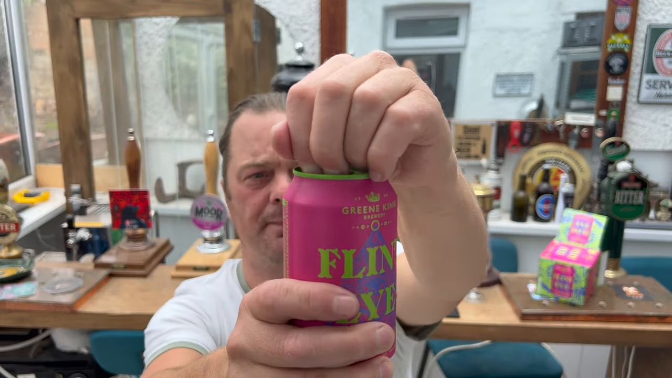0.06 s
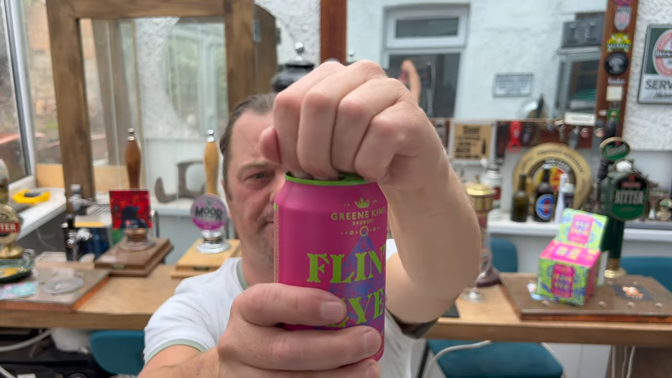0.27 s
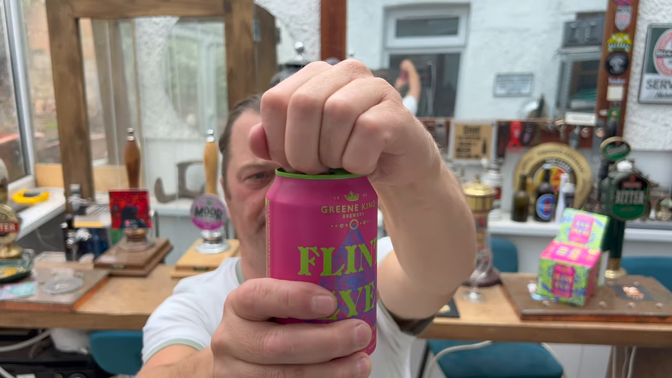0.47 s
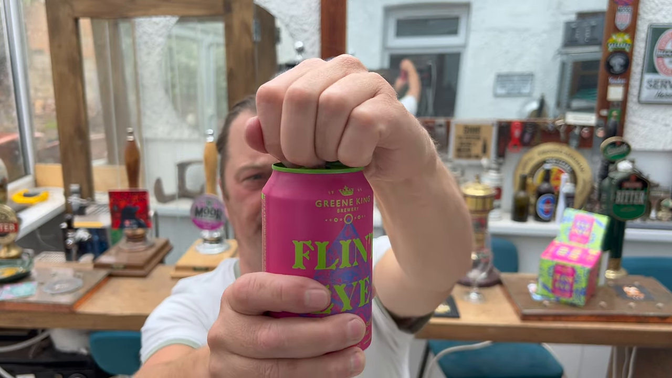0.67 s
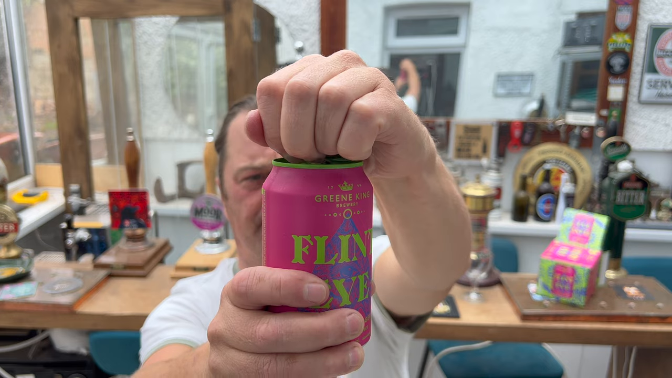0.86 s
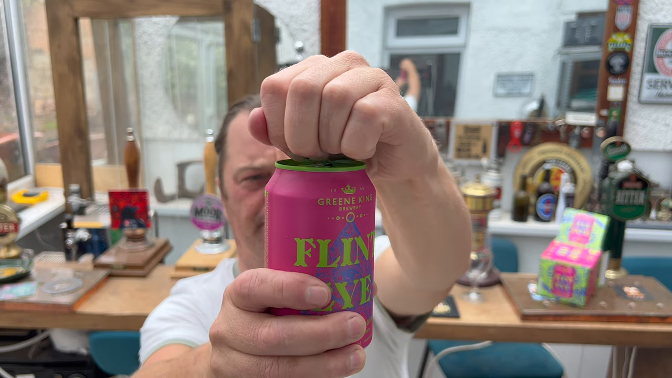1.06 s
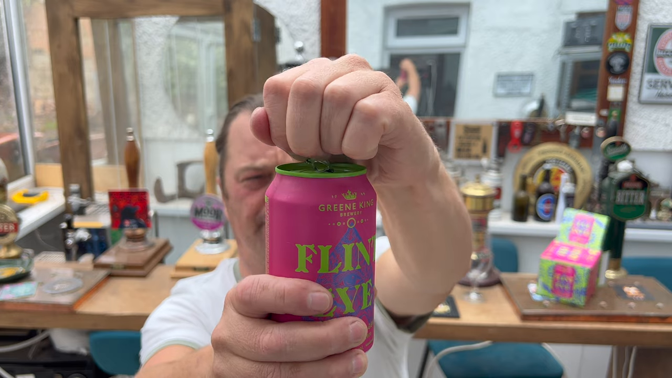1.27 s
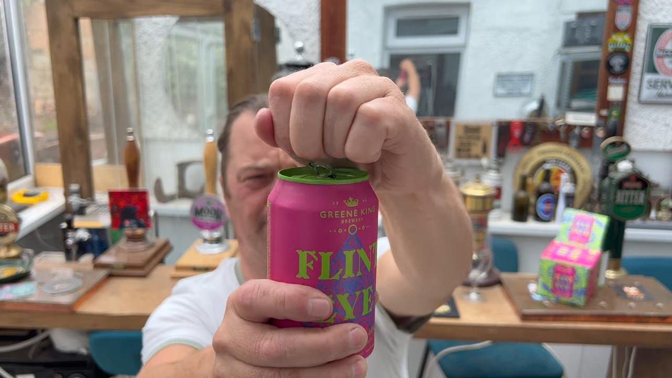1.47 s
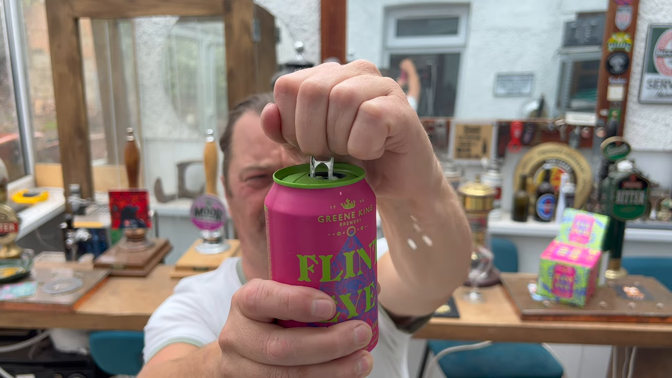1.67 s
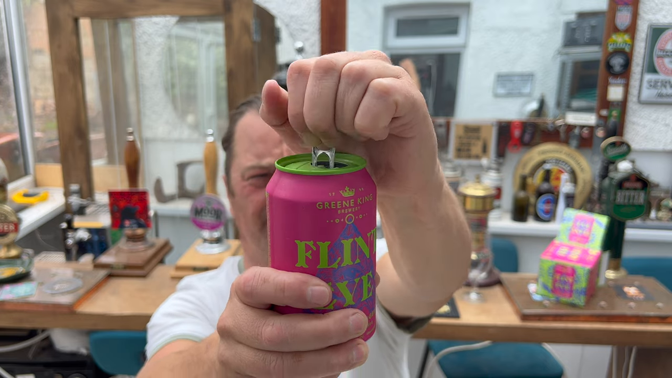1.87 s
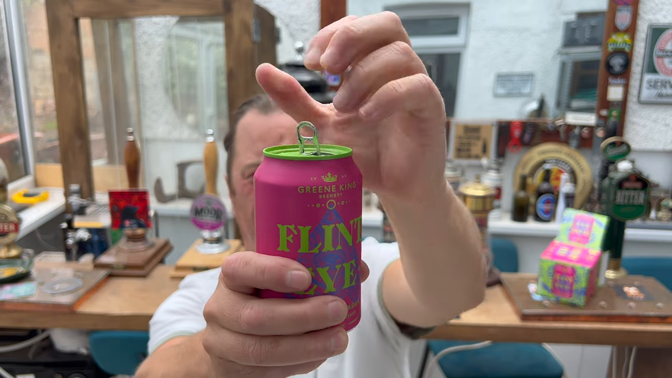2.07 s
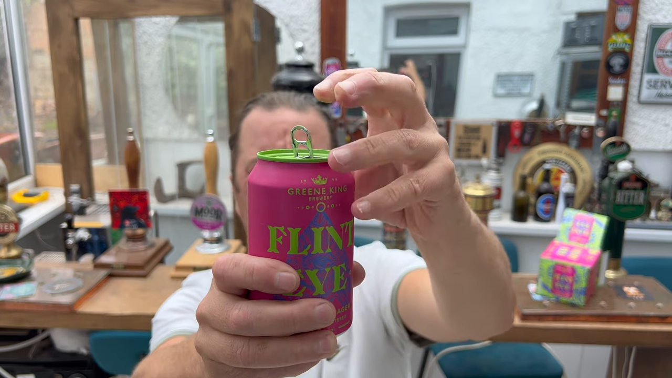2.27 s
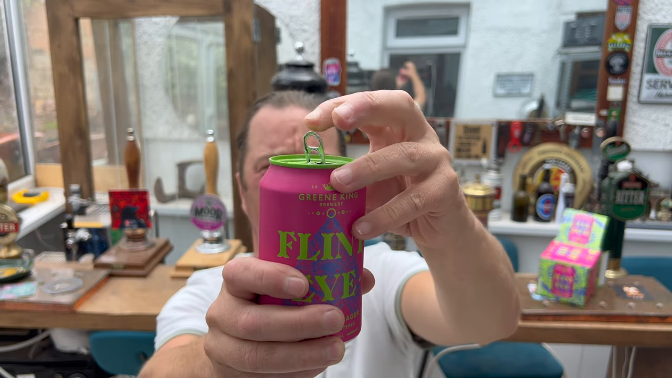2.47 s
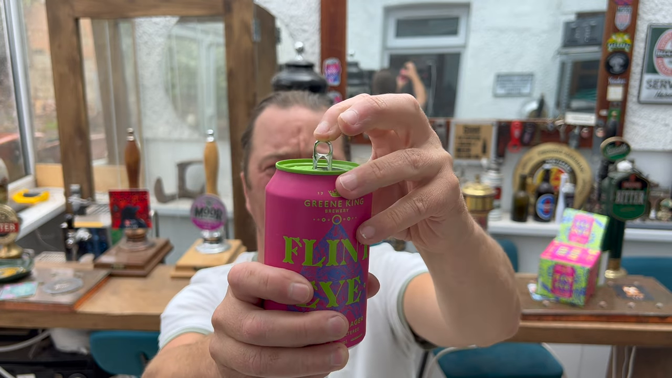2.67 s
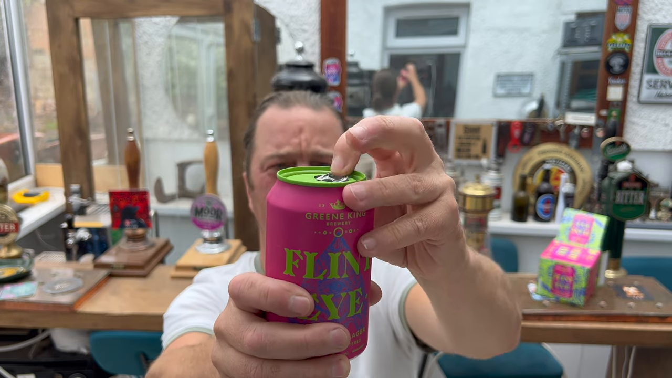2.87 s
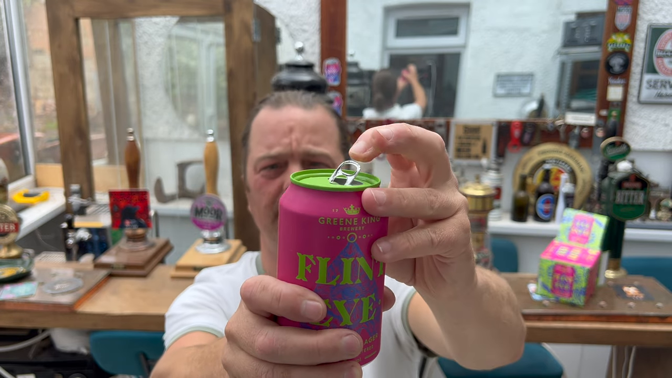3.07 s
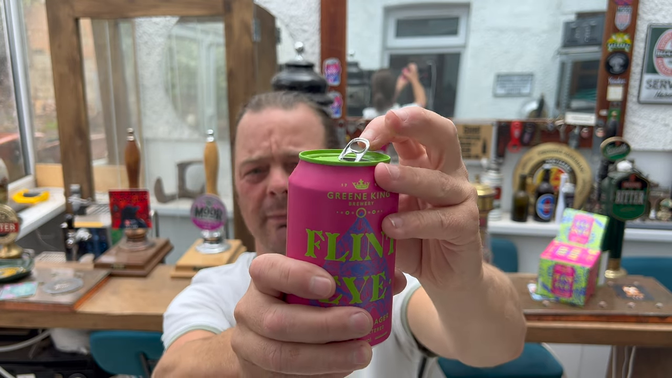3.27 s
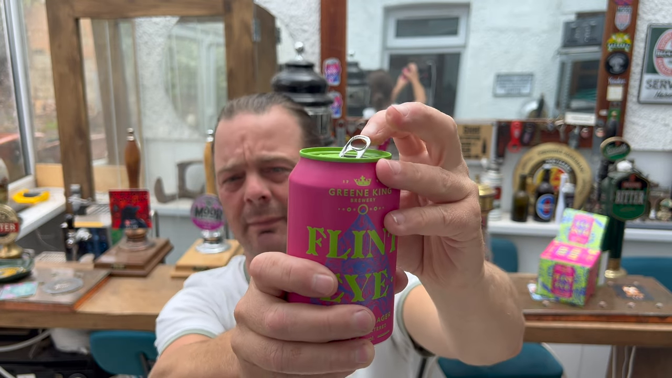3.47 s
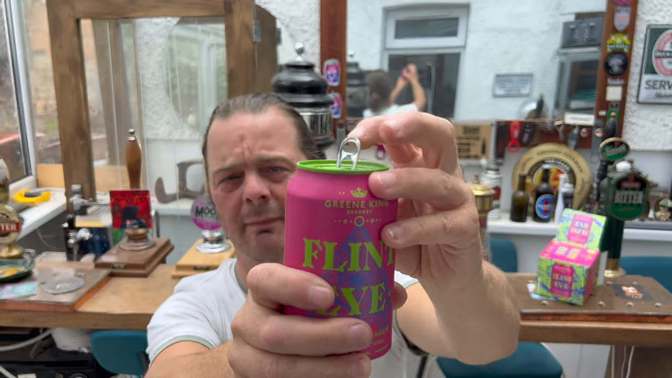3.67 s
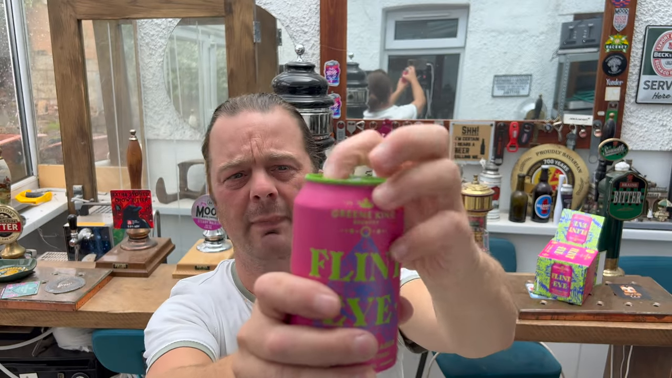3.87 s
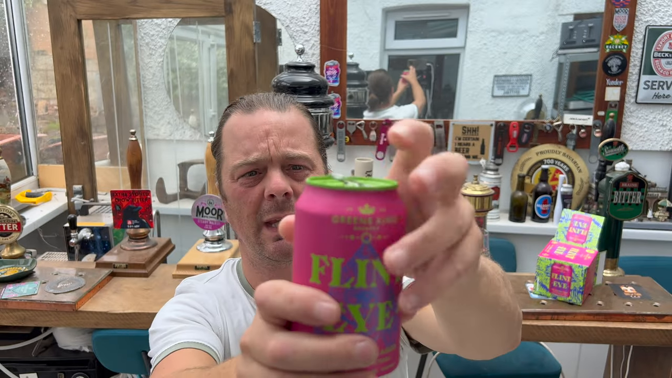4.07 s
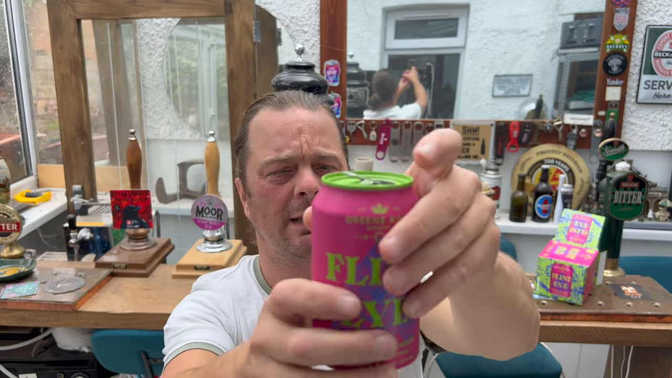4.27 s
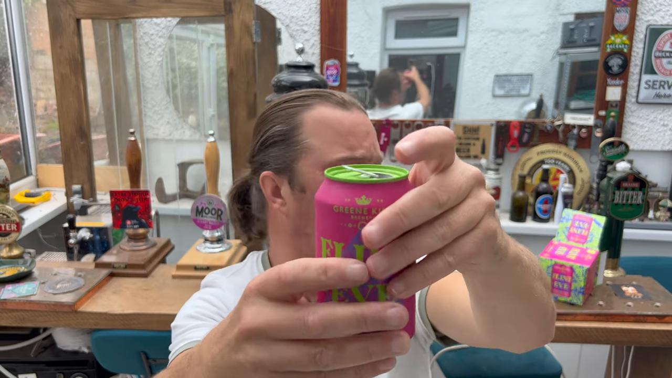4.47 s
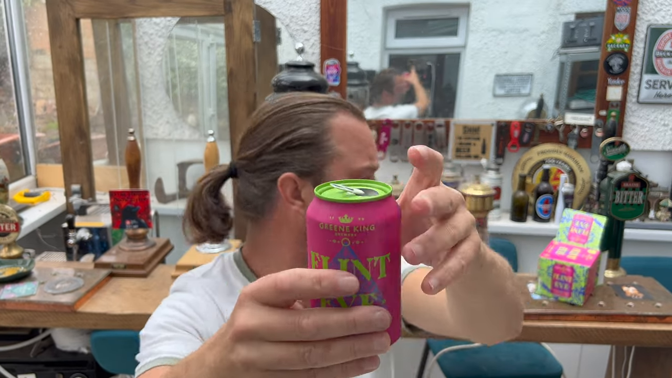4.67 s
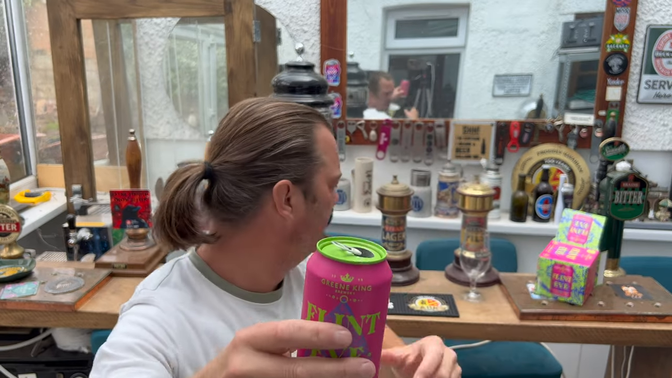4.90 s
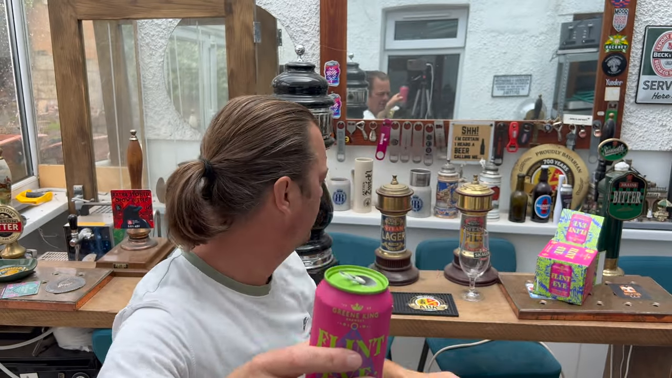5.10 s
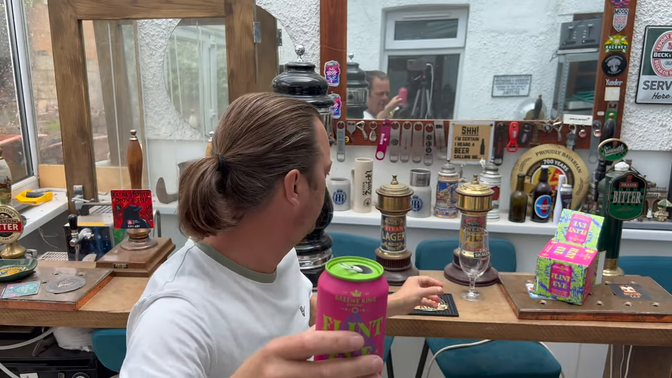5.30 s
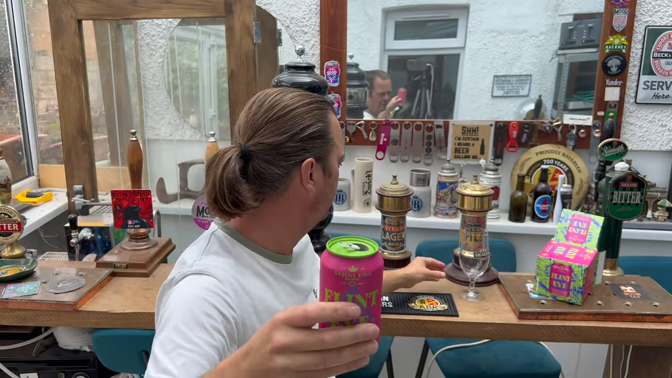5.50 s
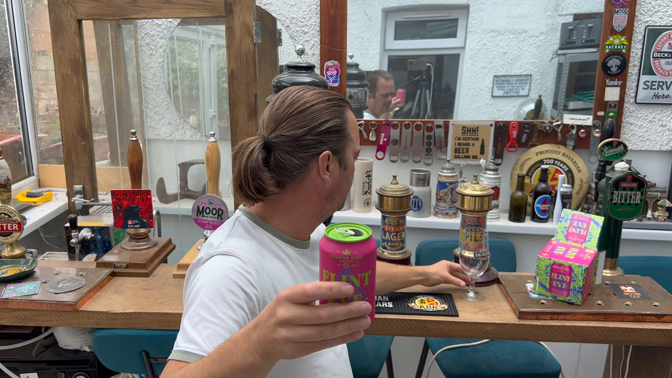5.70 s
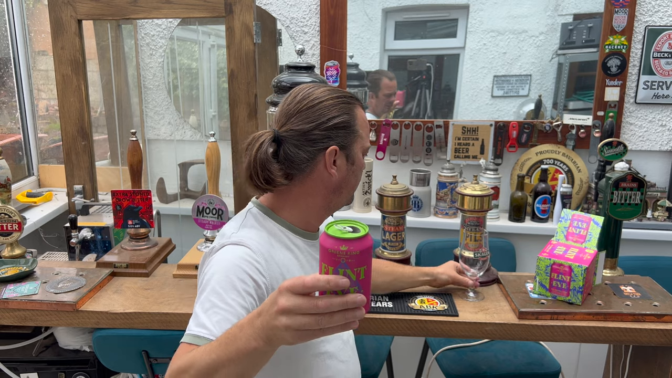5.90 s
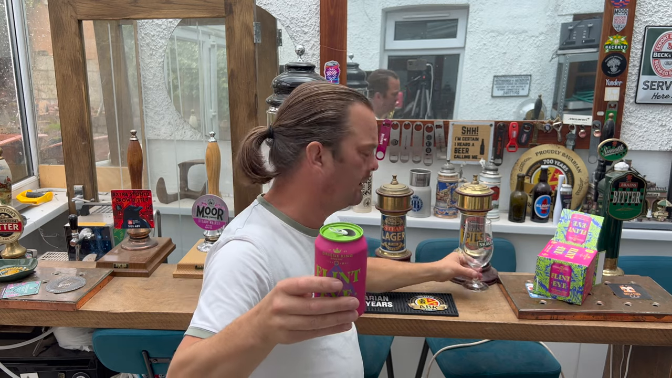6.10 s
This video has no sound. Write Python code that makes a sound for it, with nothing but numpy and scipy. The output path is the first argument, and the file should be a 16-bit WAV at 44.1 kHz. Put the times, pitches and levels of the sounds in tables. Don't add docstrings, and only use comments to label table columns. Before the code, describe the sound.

Fingertip ticks on a metal drink can, a sharp crack and gas spurt, then a deep pop, soft fizz and scattered tapping.

```python
import sys
import numpy as np
from scipy import signal
from scipy.fft import rfft, irfft, next_fast_len
from scipy.io import wavfile
from scipy.ndimage import uniform_filter1d, map_coordinates

SR = 44100
rng = np.random.default_rng(int(sys.argv[2]) if len(sys.argv) > 2 else 0)


def wav_record(signal):
    frames = np.transpose(np.atleast_2d(signal))
    bounded = np.clip(frames, -1, 1)
    quanta = np.round(bounded * 32767).astype(np.int16)
    wavfile.write(sys.argv[1], SR, quanta)


def volts(x):
    e = np.asarray(x, float) / 20
    return 10 ** e


N = 271038
T = np.arange(N) / SR

# (time [s], hum level [dB])
HUM_LEVEL = [(0, -56), (.15, -57), (.9, -58), (1.35, -58.5), (1.9, -56), (2.36, -58.5), (2.98, -62.5),
             (3.2, -63.5), (3.5, -60.5), (4.13, -57.5), (4.42, -55.5), (5.14, -58), (5.37, -55.5),
             (5.8, -57.5), (6.15, -58.5)]
# (frequency [Hz], density [dB per Hz])
AIR_SPECTRUM = [(76, -40), (130, -6.5), (182, -4.5), (272, -7.5), (337, -11.5), (363, -6), (563, -11.5),
                (631, -19.5), (733, -12), (1170, -20), (1480, -14.5), (1810, -20), (2600, -46), (3380, -70),
                (5720, -120)]
# (frequency [Hz], density [dB per Hz])
RUMBLE_SPECTRUM = [(12, -50.5), (20, -24.5), (54, -4.5), (75, -4.5), (90, -4), (120, -27.5), (200, -120)]
# (time [s], hum dip [dB], half length [s])
BASS_DUCKS = [
    (1.119, -6, 0.24),
    (1.659, -24, 0.16),
]
# (time [s], rumble level [dB], hold [s])
FLOOR_SHOVES = [
    (.9, -63, .01),
    (1.1, -59, 0.016),
    (1.54, -61, 0.28),
]
# (time [s], peak level [dB], hold [s])
RUBS = [(.198, -73, 0.018), (.476, -73.5, .01), (.66, -74.5, .01), (.85, -73, 0.042), (1.95, -68, .005),
        (2.05, -75.5, 0.093), (2.26, -76, 0.0095), (2.37, -78, .05), (2.6, -74, 0.054), (2.70, -67, .01),
        (2.84, -74.5, 0.04), (3.035, -66.5, .005), (3.2, -65.5, .005), (3.325, -69, 0.011),
        (3.44, -68, 0.0055), (3.63, -69, 0.03), (3.79, -64, .005), (3.91, -61, 0.012), (4.1, -73, 0.065),
        (4.19, -66.5, .08), (4.33, -62.5, 0.089), (4.45, -68, 0.077), (4.57, -67, 0.36),
        (4.88, -71.5, 0.35), (5.345, -59, 0.019), (5.63, -73.5, 0.099), (5.9, -75, 0.046),
        (6.11, -74.5, 0.058)]
# (frequency [Hz], density [dB per Hz])
CLOTH_SPECTRUM = [(1180, -19), (2000, -2), (2740, -9.5), (3700, -12), (6730, -10.5), (9000, -19),
                  (10200, -24), (11400, -25), (13000, -31.5)]
# (frequency [Hz], left-right likeness [-1 to 1])
DIFFUSE_LIKENESS = [(60, 0.87), (130, 0.79), (290, 0.4), (640, -0.23), (1410, 0.35), (3100, -0.1),
                    (6820, -0.043), (15000, 0.89)]
# (frequency [Hz], left minus right [dB])
DIFFUSE_BALANCE = [(60, -1.5), (110, -3), (200, 4.5), (380, 5), (700, 3), (1290, 4.5), (2380, 4),
                   (4400, 11.5), (8120, 10.5), (15000, -10)]
# (frequency [Hz], left minus right [dB])
CAN_BALANCE = [(60, 3.3), (500, 4), (1400, 1), (2400, 3), (5000, 7), (9000, 1), (15000, -.5)]
# (frequency [Hz], left lead [rad])
CAN_LEAD = [(0, 0), (1000, .45), (2000, 1.0), (4500, 2.0), (6000, 2.5), (6800, .4), (7300, -1.2),
            (9200, -2.2), (10500, -3.4), (11900, -6.3), (13600, -9.4), (15500, -12.6), (16500, -13.6)]
# (frequency [Hz], t60 [s])
ROOM_T60 = [(300, 0.53), (800, 0.24), (2000, 0.48), (5500, 0.53), (9000, 0.37), (11000, 0.26),
            (15000, 0.25)]
# (frequency [Hz], level [dB])
ROOM_LEVEL = [(200, -28), (600, -12.5), (1000, -0.5), (2000, -10), (3000, -6.5), (4200, -3.5), (5000, -14),
              (5750, -10), (6600, -10), (8000, -5), (11000, -19.5), (15000, -21.5)]
# (frequency [Hz], density [dB per Hz])
TRAIL_SPECTRUM = [(300, -40), (550, -15), (900, -2), (1600, -6), (3900, -1.5), (7140, -1.5), (9300, -10.5),
                  (11500, -44.5)]
# (time [s], peak level [dB], frequency [Hz])
BODY_BUMPS = [
    (4.546, -51.5, 177),
    (5.389, -48.5, 217.5),
    (5.416, -48.5, 176.3),
]
# (time [s], peak level [dB], knock [Hz], nail level [dB], skin level [dB])
FINGER_TICKS = [(0.181, -47, 790, -33, -15), (0.295, -38.5, 780, -64, -33), (1.942, -41, 1410, -14, -8),
                (1.955, -41.5, 859, -26, -9), (2.678, -46, 1400, -23, -7),
                (2.696, -46.5, 1209, -14.5, -4.5), (2.71, -42.5, 1190, -25.5, -7),
                (2.795, -44, 780, -35, -21), (2.834, -51, 1530, -31, -2), (3.031, -41, 1100, -11.5, -22),
                (3.198, -44.5, 1427, -10.5, -17.5), (3.316, -51, 1110, -25.5, -18),
                (3.442, -41.5, 1113, -15.5, -27.5), (3.633, -54, 1520, -19, -16),
                (3.79, -43, 1170, -16.5, -19), (3.909, -29.5, 1968, -45, -12.5),
                (4.185, -47.5, 1420, -12, -8), (4.317, -49, 1760, -9, -10), (4.326, -45.5, 1400, -7, -7),
                (4.347, -40.5, 1440, -7.5, -12)]
# (time [s], pitch [Hz], level [dB])
POP_FALL = [
    (1.554, 5600, -45),
    (1.5601, 4972, -24.5),
    (1.567, 1500, -22.5),
    (1.570, 220, -26.5),
    (1.575, 100, -30),
    (1.581, 76, -17.5),
    (1.590, 63, -25),
    (1.607, 47, -39),
    (1.623, 45, -65.5),
]
# (time [s], flow level [dB], opening [0-1])
GAS_SPURTS = [
    [(.886, -80, 0.55), (.897, -54.5, .5), (.899, -28, 0.57), (.904, -33, 0.79), (.910, -40.5, 0.3),
     (.95, -48, 0.2), (1.0, -68, .3)],
    [(1.008, -51.5, 0.6), (1.018, -44.5, .3), (1.021, -26, 0.1), (1.05, -26.5, 0.34), (1.066, -23.5, 0.4),
     (1.075, -26.5, 0.8), (1.088, -27.5, .6), (1.097, -29.5, 0.4), (1.101, -56, .8)],
    [(1.525, -48, .3), (1.531, -45.5, 0.98), (1.535, -29, 0.84), (1.552, -31, 0.87), (1.557, -19, 0.42),
     (1.566, -22, 0.58), (1.571, -46.5, 0.9), (1.61, -58, 0.81), (1.75, -90, .9)],
]
# (frequency [Hz], density [dB per Hz])
JET_SPECTRUM = [(120, -37), (400, -18.5), (1200, -16), (2000, -10), (3000, -21), (4200, -6.5), (5700, -3.5),
                (7200, -1.5), (9500, 3), (12000, 0), (15300, -11.5), (16200, -0.5), (16500, -62)]
# (frequency [Hz], level [dB])
LID_MODES = [(1420, -22.5), (1780, -12.5), (1860, -10.5), (1980, -2.5), (2110, -9), (2180, -7)]
SPURT_GRIP_DB = [-7.5, -2.6, -3]
# (time [s], lid ring [dB], rim pitch [Hz], rim ring [dB], snap [dB])
LID_BREAKS = [(.8978, -29, 7500, -26, -13), (.8998, -31, 5050, -21, -15), (1.0088, -38, 7000, -38, -32),
              (1.0190, -42, 7200, -32, -28), (1.0688, -7, 4100, -17, -22), (1.0914, -10, 5700, -17, -20),
              (1.0963, -10, 5700, -14, -15), (1.5262, -33, 8000, -40, -30), (1.5318, -18, 8000, -26, -13),
              (1.5356, -18, 4600, -20, -8), (1.5560, -28, 7000, -27, -15), (1.5615, -26, 5500, -19, -12),
              (1.5643, -18, 4300, -21, -16)]

HUM_HZ, HUM_WIDTH_HZ, USUAL_HUM_DB = 106.6, 42, -56.5
AIR_DB, AIR_DB_PER_HUM_DB, AIR_DUCK = -59.5, .45, 1.9
RUMBLE_DB, RUMBLE_DB_PER_HUM_DB = -64, 2.6
SHOVE_RISE_DB_PER_S, SHOVE_FALL_DB_PER_S = 12.5, 89
RUB_RISE_DB_PER_S, RUB_FALL_DB_PER_S, FAR_HISS_DB = 65, 146, -78.5
PORTS_HZ, PORTS_LIKENESS = 8500, .7
BOOM_START_S, BOOM_PEAK_S, BOOM_HZ, BEAT_HZ, NEIGHBOUR_GAIN = 1.61, 1.88, 48.9, 4.4, 0.51
BOOM_DB, BOOM_RISE_DB_PER_S, BOOM_FALL_DB_PER_S = -38.5, 8, 115.5
TRAIL_START_S, TRAIL_DB, TRAIL_FALL_DB_PER_S, TRAIL_FALL_DB_PER_S2 = 1.578, -39.5, 34.5, 75
SKIN_TOP_DB = -8
TROUGH_S = 1.5808
BREATHY_HZ, BREATHY_GAIN = 1500, 0.95
LID_SHUT_DB, LID_OPENS_DB = -14, 21.5
RIM_SHUT_DB, RIM_OPENS_DB = -18.5, 28.5
RIM_SHUT_HZ, RIM_DROP_HZ = 7380, 2585
LID_HZ, LID_SAG_HZ_PER_DB = 1863, 10
TEAR_S = .0031
THUD_DB, THUD_DB_PER_LID_DB, THUD_T60_S = -19, 1.6, 0.024


def unit(x):
    return x / np.sqrt(np.mean(x ** 2) + 1e-20)


def along(points, hz):
    f, v = np.transpose(points)
    return np.interp(np.log(hz + 1), np.log(f + 1), v)


def curves(rows, outside=None):
    s, *cols = np.transpose(rows)
    return np.array([np.interp(T, s, c, outside, outside) for c in cols])


def strokes(rows, rise_db, fall_db, rest_db):
    levels = [rest_db + 0 * T]
    for s, db, hold in rows:
        rise = rise_db / np.sqrt(abs(hold) + 1e-3) * np.maximum(s - T, 0)
        levels.append(db - rise - fall_db * np.maximum(T - s - hold, 0))
    return np.max(levels, axis=0)


def wobble(rate_hz):
    return map_coordinates(rng.standard_normal(int(N * rate_hz / SR) + 4), [T * rate_hz])


def filtered(x, response):
    m = next_fast_len(N + SR // 2)
    return irfft(rfft(x, m) * response(np.fft.rfftfreq(m, 1 / SR)), m)[..., :N]


def band(x, lo_hz, hi_hz):
    sos = signal.butter(N=2, Wn=[lo_hz, hi_hz], btype="band", fs=SR, output="sos")
    return unit(signal.sosfilt(sos, x))


def resonant(modes, width_hz):
    def peaks(f):
        return sum(volts(db) * 1j * f * width_hz / (c * c - f * f + 1j * f * width_hz) for c, db in modes)
    return unit(filtered(rng.standard_normal(N), peaks))


def small_body(x, corner_hz):
    return filtered(x, lambda f: (1j * f / (corner_hz + 1j * f)) ** 3)


def add(out, s, sound):
    out[round(s * SR):][:len(sound)] += sound


def diffuse(pair, gain):
    def split(hz):
        ports = PORTS_LIKENESS * np.cos(np.interp(hz, *np.transpose(CAN_LEAD)))
        likeness = np.where(hz > PORTS_HZ, ports, along(DIFFUSE_LIKENESS, hz))
        turn = np.arccos(np.clip(likeness, -1, 1)) / 2
        return gain(hz) * np.array([np.cos(turn), np.sin(turn)])

    mid, side = filtered(pair, split)
    left_right = np.array([mid + side, mid - side])
    return filtered(left_right, lambda hz: volts(np.outer([.5, -.5], along(DIFFUSE_BALANCE, hz))))


def rush(spectrum, patchy_db):
    z = signal.stft(rng.standard_normal((2, N)), nperseg=512)[2]
    field = uniform_filter1d(rng.standard_normal(z.shape[1:]), size=6, axis=0)
    field = uniform_filter1d(field, size=10, axis=1)
    pair = signal.istft(z * volts(patchy_db * unit(field)), nperseg=512)[1][:, :N]
    return unit(diffuse(pair, lambda hz: volts(along(spectrum, hz))))


def room_tone():
    hum_db = curves(HUM_LEVEL)[0]
    duck_db = sum(db * np.maximum(1 - np.abs(T - s) / half, 0) for s, db, half in BASS_DUCKS)
    change_db = hum_db - USUAL_HUM_DB
    air_db = AIR_DB + AIR_DB_PER_HUM_DB * change_db - AIR_DUCK * duck_db ** 2 / 10
    shove_db = strokes(FLOOR_SHOVES, SHOVE_RISE_DB_PER_S, SHOVE_FALL_DB_PER_S, -140)
    rumble_db = np.maximum(RUMBLE_DB + RUMBLE_DB_PER_HUM_DB * change_db, shove_db)
    line = np.sin(2 * np.pi * HUM_HZ * T + .5 * wobble(4))
    hum = unit(line + .25 * resonant([(HUM_HZ, 0)], width_hz=HUM_WIDTH_HZ))
    air = volts(air_db) * rush(AIR_SPECTRUM, patchy_db=.8)
    rumble = volts(rumble_db) * rush(RUMBLE_SPECTRUM, patchy_db=1)
    return air + rumble + volts(hum_db + duck_db) * hum * volts([[1.4], [-1.6]])


def rustle():
    db = strokes(RUBS, RUB_RISE_DB_PER_S, RUB_FALL_DB_PER_S, FAR_HISS_DB) + 1.2 * wobble(30)
    return volts(db) * rush(CLOTH_SPECTRUM, patchy_db=2.0)


def room(x):
    hz, t, z = signal.stft(rng.standard_normal((2, SR)), SR, nperseg=256)
    tail = signal.istft(z * volts(-60 * t / along(ROOM_T60, hz)[:, None]), SR, nperseg=256)[1]
    tail = tail * np.clip((np.arange(tail.shape[1]) / SR - .0105) / .003, 0, 1)
    wet = signal.fftconvolve(x[None], tail / np.linalg.norm(tail[0]), axes=1)[:, :N]
    return diffuse(wet, lambda hz: volts(along(ROOM_LEVEL, hz)))


def near(x):
    half = np.array([[.5], [-.5]])
    lead_hz, lead_rad = np.transpose(CAN_LEAD)

    def ports(hz):
        return volts(half * along(CAN_BALANCE, hz)) * np.exp(1j * half * np.interp(hz, lead_hz, lead_rad))
    return filtered(x, ports)


def boom():
    t = T - BOOM_PEAK_S
    db = BOOM_DB + BOOM_RISE_DB_PER_S * np.minimum(t, 0) - BOOM_FALL_DB_PER_S * np.maximum(t, 0)
    fade = np.clip((T - BOOM_START_S) / 0.028, 0, 1)
    mode = np.sin(2 * np.pi * (BOOM_HZ + BEAT_HZ / 2) * t)
    neighbour = NEIGHBOUR_GAIN * np.sin(2 * np.pi * (BOOM_HZ - BEAT_HZ / 2) * t)
    return fade * volts(db) * (mode + neighbour) * volts([[1.6], [-1.9]])


def trailing_hiss():
    t = np.maximum(T - TRAIL_START_S, 0)
    db = TRAIL_DB - TRAIL_FALL_DB_PER_S * t - TRAIL_FALL_DB_PER_S2 * t ** 2 + 1.5 * wobble(300)
    return (1 - volts(-600 * t)) * volts(db) * rush(TRAIL_SPECTRUM, patchy_db=2.0)


def fingers():
    out, t = np.zeros(N), np.arange(SR // 10) / SR
    partials = ((.72, 0.41), (.89, 0.45), (1, 1.22), (1.13, 0.4), (1.37, 0.18))
    for s, db, hz, nail_db, skin_db in FINGER_TICKS:
        noise = rng.standard_normal(len(t))
        knock = sum(g * np.sin(2 * np.pi * hz * k * t) for k, g in partials)
        knock = knock * volts(-60 * t / 0.027) * (1 - volts(-20000 * t))
        grit = volts(nail_db) * band(noise, 2550, 2740) + volts(skin_db) * band(noise, 2880, 8500)
        grit = grit + 0.33 * band(noise, 0.36 * hz, 1.75 * hz)
        puff = volts(skin_db + SKIN_TOP_DB - 60 * t / .006) * band(noise, 8000, 16000)
        add(out, s, volts(db - 6) * (knock + grit * volts(3 - 60 * t / .045) + puff))
    out = small_body(out, corner_hz=450.0)
    for s, db, hz in BODY_BUMPS:
        add(out, s, volts(db - 60 * t / 0.075) * np.sin(2 * np.pi * hz * t))
    return out


def pop():
    s, hz, db = np.transpose(POP_FALL)
    pitch_hz = np.exp(np.interp(T, s, np.log(hz)))
    turns = np.cumsum(pitch_hz) / SR
    swing = -np.cos(2 * np.pi * (turns - turns[round(TROUGH_S * SR)]))
    rough = np.clip(BREATHY_GAIN * np.minimum(pitch_hz / BREATHY_HZ, 1), 0, 1)
    return volts(np.interp(T, s, db, -140, -140) + 5.5) * swing * (1 - rough + rough * wobble(1500))


def gas():
    hiss_db, opening = np.max([curves(rows, -140) for rows in GAS_SPURTS], axis=0)
    opening = np.clip(opening, 0, 1)
    later_starts_s = [rows[0][0] for rows in GAS_SPURTS[1:]]
    grip_db = np.take(SPURT_GRIP_DB, np.searchsorted(later_starts_s, T))
    lid_db = hiss_db + grip_db + LID_SHUT_DB + LID_OPENS_DB * opening
    rim_db = hiss_db + RIM_SHUT_DB + RIM_OPENS_DB * opening
    rim_hz = RIM_SHUT_HZ - RIM_DROP_HZ * opening
    hiss = unit(filtered(rng.standard_normal(N), lambda hz: volts(along(JET_SPECTRUM, hz))))
    spits = volts(2 * np.clip(wobble(500), -3, 1.5))
    rim = unit(wobble(1400) * np.sin(2 * np.pi * np.cumsum(rim_hz) / SR))
    lid = small_body(resonant(LID_MODES, width_hz=160), corner_hz=700)
    return spits * volts(hiss_db) * hiss + volts(lid_db + 2) * lid + volts(rim_db) * rim


def cracks():
    out, t = np.zeros(N), np.arange(SR // 10) / SR
    damped = volts(-300 * t - 11000 * np.maximum(t - TEAR_S, 0)) * (1 - volts(-25000 * t))
    lid_partials = ((1, 1), (.92, .25), (.73, .1), (1.11, .2))
    for s, lid_db, rim_hz, rim_db, snap_db in LID_BREAKS:
        lid_hz = LID_HZ - LID_SAG_HZ_PER_DB * lid_db
        lid = sum(g * np.sin(2 * np.pi * lid_hz * k * t) for k, g in lid_partials)
        rim = sum(np.sin(2 * np.pi * (rim_hz * k * t + rng.random())) for k in (.9, .96, 1.02, 1.09))
        snap = np.diff(rng.standard_normal(len(t) + 2), n=2) * volts(snap_db - 9 - 8000 * t)
        add(out, s, damped * (volts(lid_db) * lid + volts(rim_db - 4) * rim) + snap)
        thud_db = THUD_DB_PER_LID_DB * lid_db + THUD_DB - 60 * t / THUD_T60_S
        add(out, s, volts(thud_db) * band(rng.standard_normal(len(t)), 300, 1300))
    return small_body(out, corner_hz=250)


def scene():
    can = cracks() + gas() + pop() + fingers()
    return near(can) + room(can) + boom() + room_tone() + rustle() + trailing_hiss()


def band_limit(x):
    return signal.sosfilt(signal.butter(12, 17000, fs=SR, output="sos"), x)


def record(dry):
    mix = filtered(dry, lambda hz: volts(-np.maximum(hz - 15800, 0) / 5))
    return band_limit(mix)


dry = scene()
out = record(dry)
wav_record(out)
```